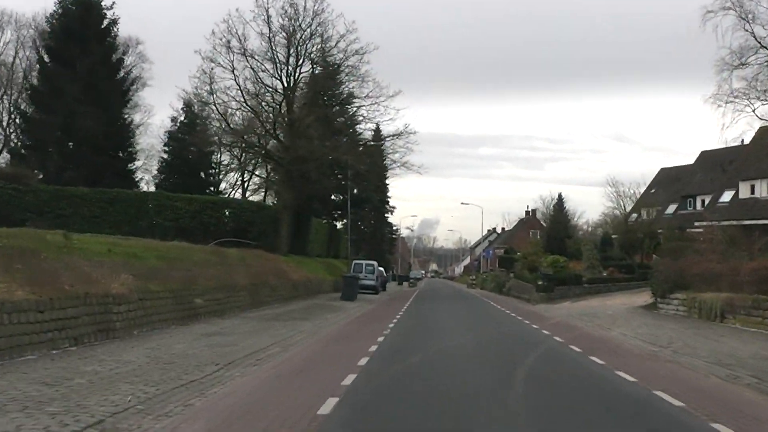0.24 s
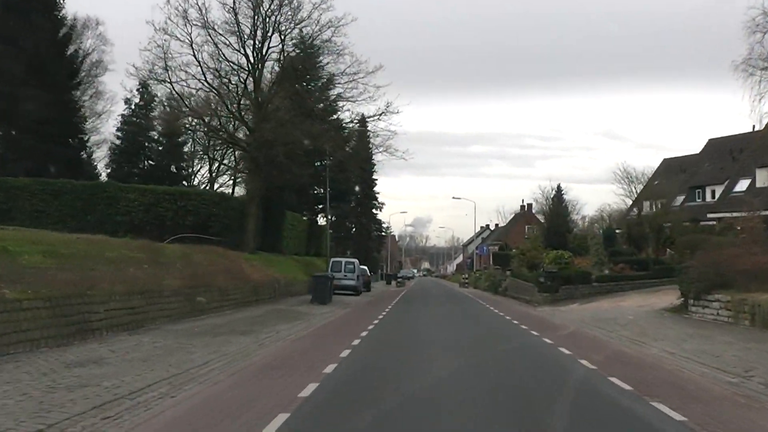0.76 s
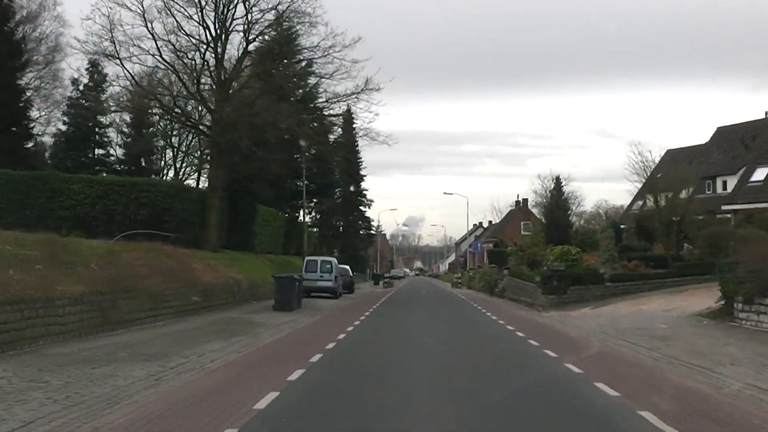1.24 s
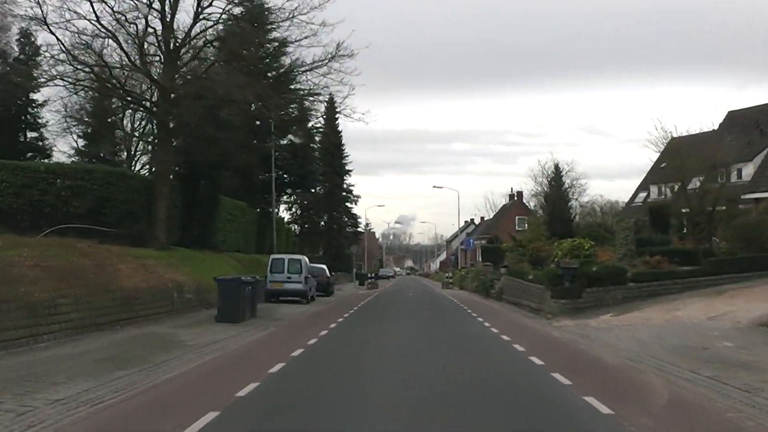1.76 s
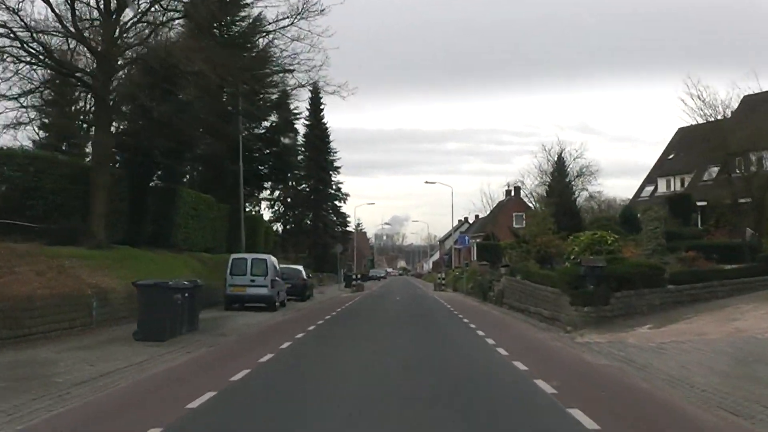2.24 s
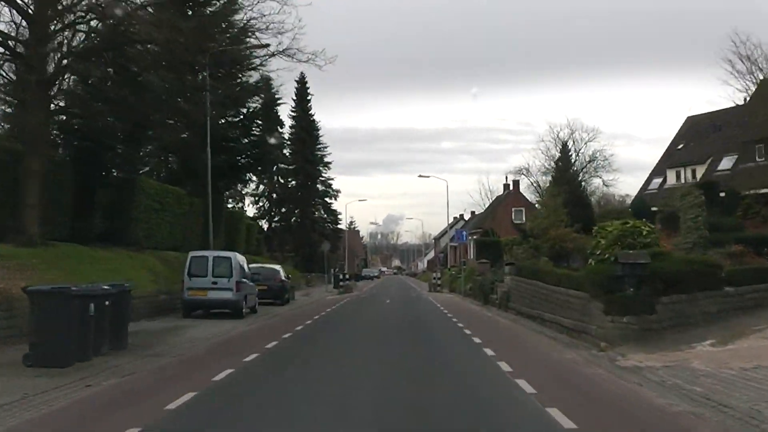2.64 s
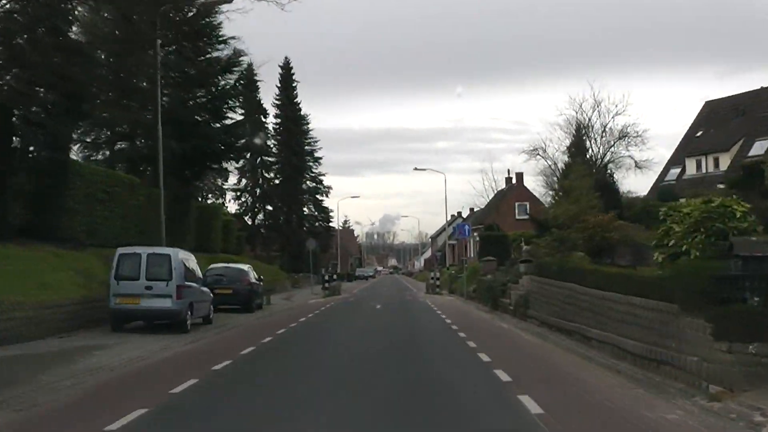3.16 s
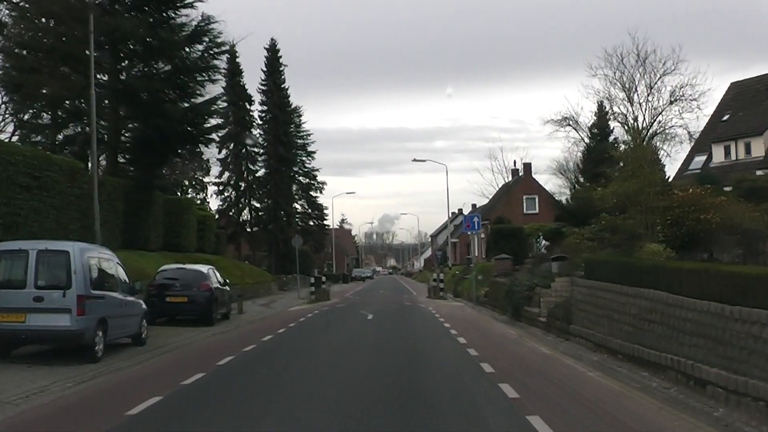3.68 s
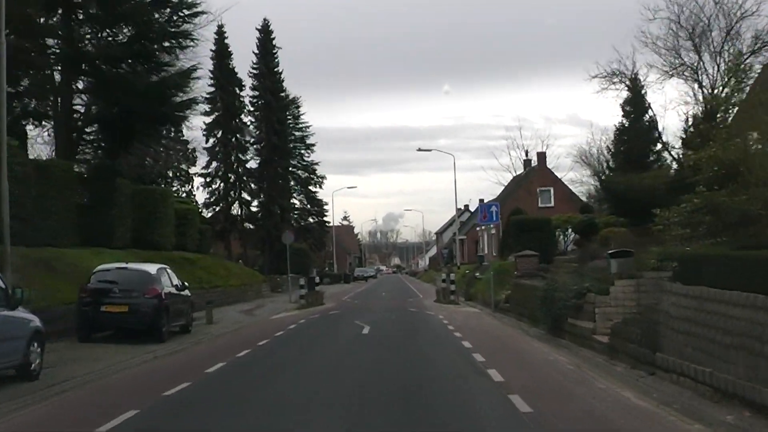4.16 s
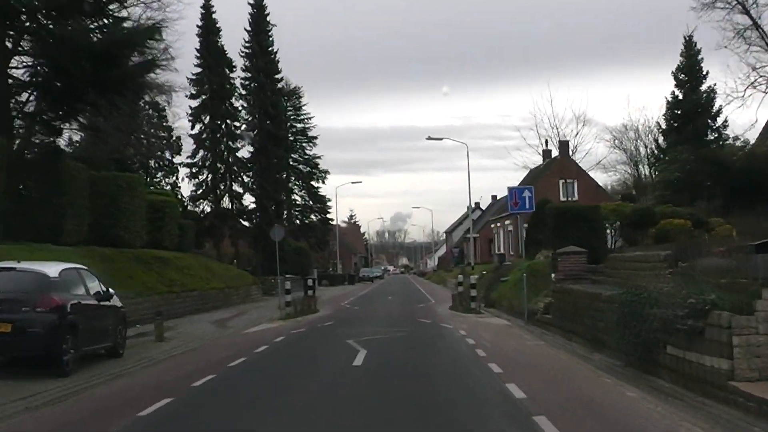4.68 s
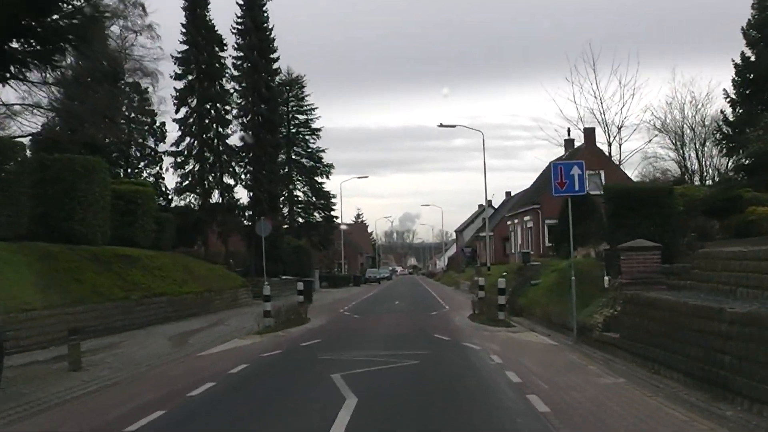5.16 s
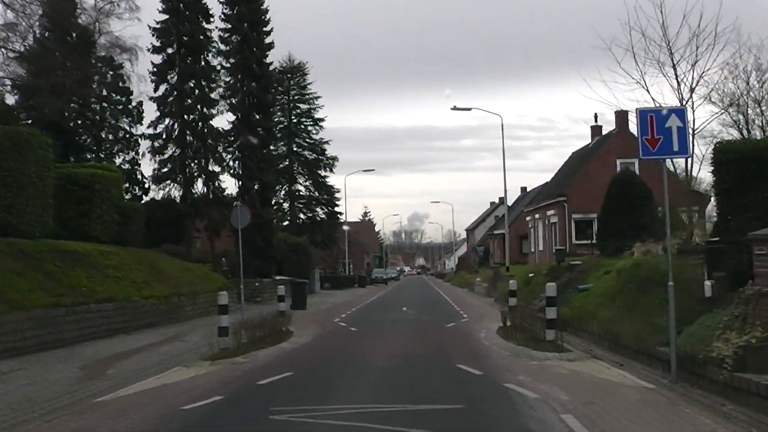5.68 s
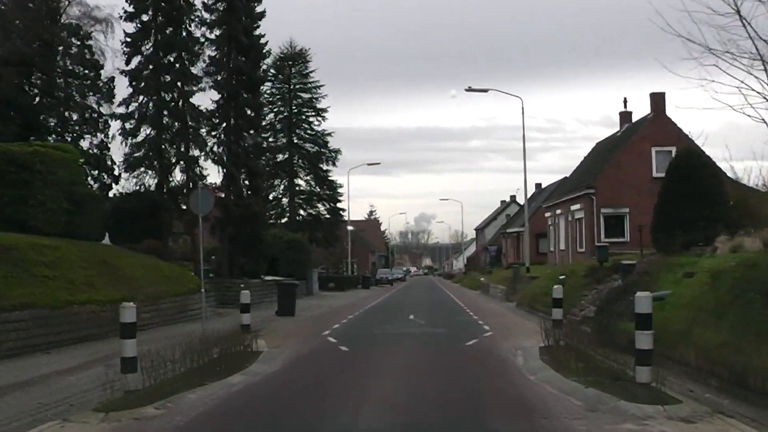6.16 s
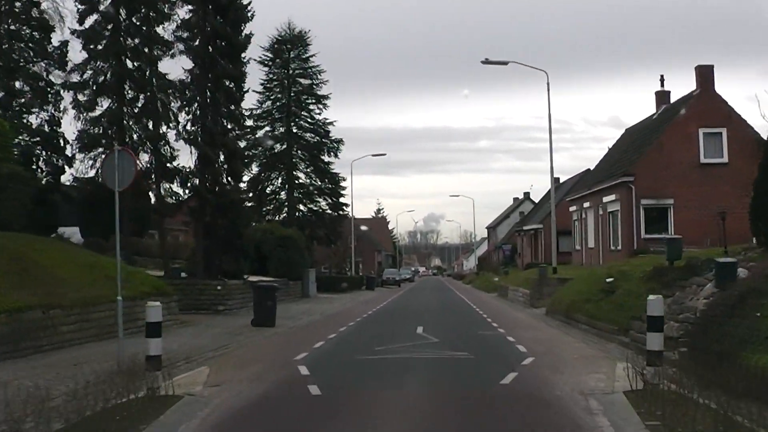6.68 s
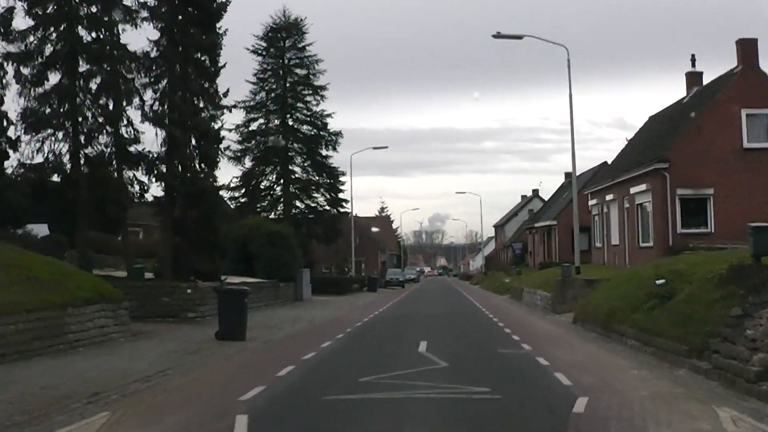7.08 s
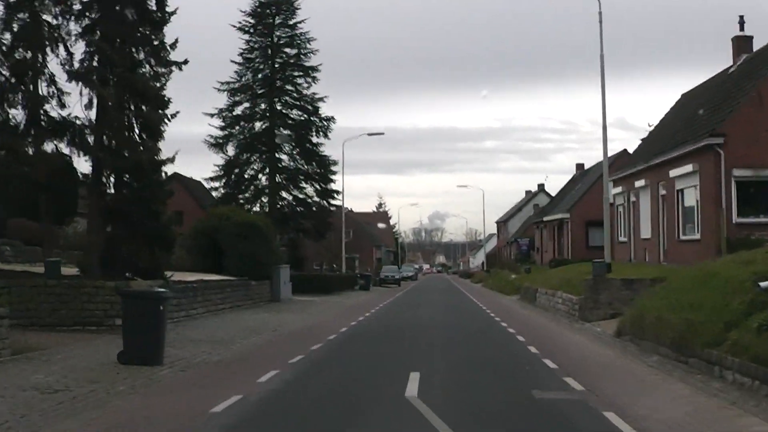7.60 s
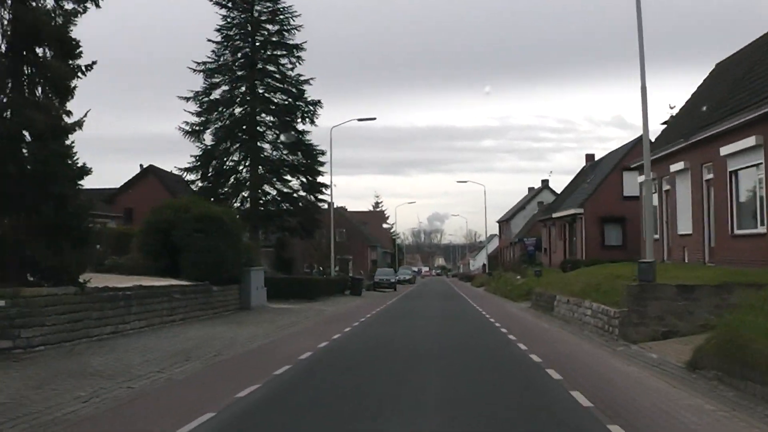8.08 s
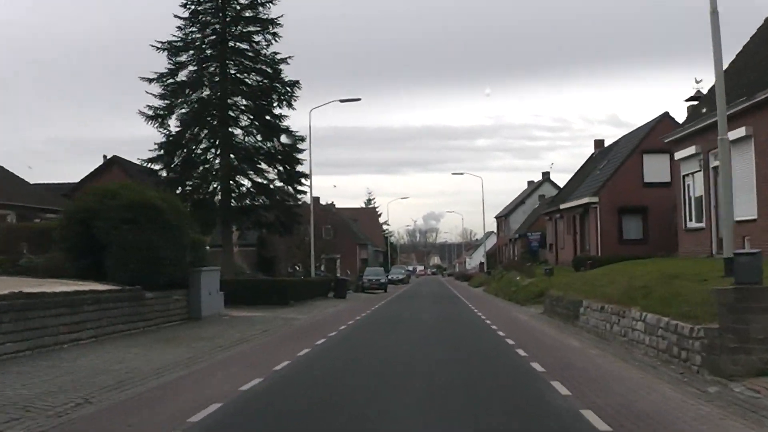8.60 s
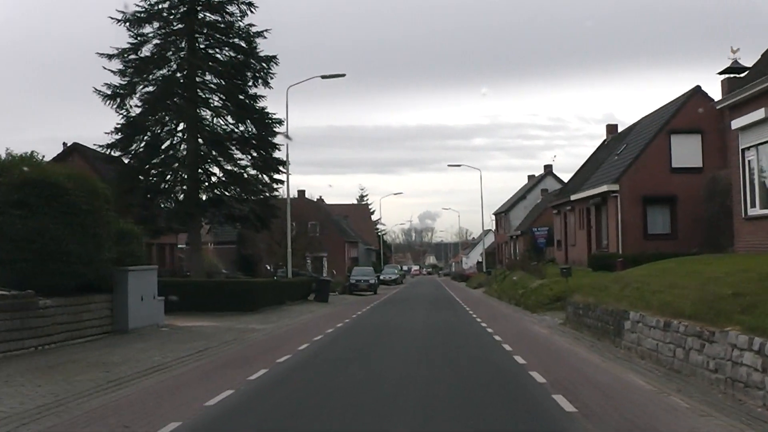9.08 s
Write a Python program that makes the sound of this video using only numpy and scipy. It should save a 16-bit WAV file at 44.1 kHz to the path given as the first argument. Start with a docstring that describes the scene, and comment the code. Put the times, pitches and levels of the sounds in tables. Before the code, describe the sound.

Inside a car driving steadily along a village street, a deep cabin drone and muffled tyre roar run throughout. Small soft bumps come early. Around seven seconds a rough patch makes the body boom heavily while loose trim ticks in quick bright snaps. A few hard knocks follow near eight and a half seconds, then the drone continues. Small stereo microphone on the dashboard, close, with automatic gain and faint noise.

```python
"""A low drone fills a car on an asphalt street: the road shakes springs, body, cabin air and tyre cavities,
each a bank of resonances fed with noise. Over it lies tread roar, noise coloured by the body panels.
A rougher stretch makes the body boom and loose trim tick; there are a few knocks and one click of a clipping
boom peak, all made of ringing noise bursts, and faint squeaks, made of wobbling sines. Faint treble hiss swells
at times. A small stereo microphone with gain control sits on the dashboard and adds its own floor and whine."""
import sys
import numpy as np
from scipy import signal
from scipy.fft import rfft, irfft, next_fast_len
from scipy.io import wavfile
from scipy.ndimage import uniform_filter1d

SR = 44100
rng = np.random.default_rng(int(sys.argv[2]) if len(sys.argv) > 2 else 0)


def nominal_scale(level):
    """Amplitude ratio for a level in decibels (scalar or array-like)."""
    x = np.asarray(level, float) / 20
    return 10 ** x


def wrap_up_sound(samples):
    """Save the sound to the file named by the first command line argument, as 16-bit audio."""
    columns = np.atleast_2d(samples).T
    # keep every value between -1 and 1, then stretch to whole-number steps
    tamed = np.clip(columns, -1, 1)
    steps = np.round(tamed * 32767).astype(np.int16)
    wavfile.write(sys.argv[1], SR, steps)


N = 411894
T = np.arange(N) / SR

# resonances driven by the road: (frequency [Hz], width [Hz], relative level [dB])
SPRING_RESONANCES = [(22.1, 4, -6), (34.5, 8, -2.5)]
SHELL_RESONANCES = [(46.7, 7.7, 0), (52, 4.2, -2.5), (100, 40, -16.5)]
CABIN_RESONANCES = [(65, 5, -11.5), (75.4, 7.9, -8.5), (89, 2.6, -8.5), (97.7, 5.3, 1.5), (117.1, 14, 0),
                    (141.2, 26, -8.5), (173.4, 16, -12)]
TYRE_RESONANCES = [(202.3, 14, -7), (212.3, 8, 0.5), (220.3, 19, -9)]
# bumps under the wheels: (start [s], length [s], strength [dB], share taken by the springs [0-1], rest by the shell)
WHEEL_BUMPS = [(.07, 0.077, -15, 0.42), (.55, 0.11, -21.5, .05), (2.28, 0.076, -21, .05),
               (2.72, .17, -18.5, .1), (3.3, 0.087, -23, 0.17), (3.63, 0.08, -17.5, 0.52),
               (3.88, .32, -19, 0.18), (5.26, 0.11, -23, .95), (5.66, .27, -23.5, 0.043),
               (5.959, 0.073, -26.5, .95), (6.92, 0.15, -10, .4), (7.15, .11, -6.5, .4),
               (7.39, .08, -6, 0.89), (7.52, 0.094, -4.5, .9), (7.67, 0.056, -8, 0.23),
               (7.86, 0.054, -10.5, .4), (8.16, .12, -15, 0.48), (8.46, 0.055, -9.5, .7),
               (8.72, 0.1, -13.5, 0.75), (8.96, 0.043, -19.5, .05), (9.12, 0.097, -31, 1)]
# the cabin drone wavers up now and then: (start [s], length [s], level [dB])
CABIN_SWELLS = [(0, 0.48, -22.5), (1.72, 0.44, -23), (3.25, 0.42, -24.5), (3.948, 0.23, -27),
                (5.1, .5, -27), (5.9, .4, -26), (7.2, 0.13, -21.5), (7.952, 0.69, -23), (9.1, .24, -24.5)]
# the tyre hum wavers up now and then: (start [s], length [s], level [dB])
TYRE_SWELLS = [(0, .4, -26.5), (0.655, 0.15, -23.5), (1.557, 0.25, -25.5), (2.636, 0.14, -23),
               (3.24, 0.07, -23.5), (3.846, 0.44, -24), (4.557, .15, -24.5), (5.15, 0.034, -29.5),
               (5.686, 0.32, -27), (6.806, 0.18, -24.5), (7.4, .25, -27), (7.745, .6, -29),
               (8.6, 0.31, -26), (9.144, 0.1, -26.5)]
# tread noise after muffling by the body: (frequency [Hz], relative density [dB per Hz])
ROAR_SPECTRUM = [(60, -25), (150, -7.5), (250, 0), (400, -5), (600, -14), (800, -18.5), (1100, -21),
                 (1350, -28.5), (1700, -33), (2000, -38.5), (2300, -46.5), (2450, -59), (3500, -68)]
# body panels that lift the roar or notch it: (frequency [Hz], width [Hz], lift [dB])
PANEL_RESONANCES = [(299.3, 13, 2), (349.7, 7.4, 3.5), (377, 15, 2), (465.4, 32, 2.5), (545, 18, 2.5),
                    (579, 30, -4), (681, 100, 6.5), (878, 17, 7), (959, 54, 7.5), (1096, 30, 4),
                    (1211, 33, 3), (1442, 57, 4), (1632, 70, 6), (1770, 37, 4), (2240, 60, 1.5)]
# trim ticks: (time [s], snap peak [dB], centre [Hz], scatter about a millisecond later [dB], left minus right [dB])
TRIM_TICKS = [(0.1438, -48, 7300, -58.5, -2), (0.2883, -45, 8800, -50, 1), (3.848, -47, 8500, -53, 0),
              (4.3414, -49, 7900, -62, 2), (4.6103, -47, 7200, -52, 2), (5.2434, -54, 6300, -62, 3),
              (6.9771, -48, 6100, -59, 3.5), (7.0541, -41, 5900, -49, -3), (7.07, -27, 6200, -46, -4),
              (7.088, -39, 6200, -44, -1), (7.12, -31, 7300, -47.5, -3), (7.1586, -30, 7100, -48, -4.5),
              (7.193, -29, 6500, -55, -2), (7.197, -22, 10500, -43, -2), (7.2105, -35, 6800, -41, -3),
              (7.2674, -41, 6500, -45, -1), (7.2916, -37, 6500, -47, -4), (7.3122, -18, 7300, -41, -2),
              (7.3273, -36, 8600, -56, -2.5), (7.3504, -39, 6400, -48, -5), (7.3559, -29, 9200, -48, 2),
              (7.373, -27, 6500, -50, -5), (7.4379, -42, 6500, -51, -3), (7.4556, -23, 7000, -43, -5),
              (7.4832, -38, 6000, -47, -4), (7.507, -24, 7200, -45, -5), (7.5472, -14.5, 13500, -48, 3),
              (7.5511, -30, 7000, -48, -1), (7.601, -46, 9000, -60, 1), (7.6103, -43, 7600, -52, -4),
              (7.6595, -21.5, 8200, -38, -2), (8.4663, -33, 8800, -48.5, -1), (9.2833, -46, 10000, -61, -1)]
# colour shared by the ticks: (frequency [Hz], relative density [dB per Hz])
TRIM_SPECTRUM = [(800, -23), (2000, -3), (3300, -10), (4300, -3), (7000, -6), (11000, -9), (16000, -16.5)]
# knocks of a hard object, except 7.225 s: that is a broadband click where a boom peak clips;
# (time [s], level before decay [dB], t60 [s], treble tilt [dB per octave], left minus right [dB])
KNOCKS_AND_CLICK = [(6.94, -39, 0.025, -4, 4), (7.225, -25, 0.012, -5, 3), (8.46, -38, 0.018, -8, 3),
                    (8.4658, -27.5, 0.035, -16, 1), (8.5642, -25.5, 0.058, -6, 3),
                    (8.576, -35, 0.035, -9, 0)]
# resonances that colour the knocks and the click: (frequency [Hz], width [Hz], relative level [dB])
BURST_RESONANCES = [(1100, 400, -12), (1550, 300, -10), (1870, 110, -3), (1970, 110, 0), (2350, 200, -10),
                    (3000, 250, -13), (4150, 450, -12), (4700, 300, -14), (5550, 350, -10),
                    (6200, 450, -12), (7900, 1500, -24)]
# faint squeaks of rubbing trim: (start [s], length [s], pitch [Hz], level [dB])
TRIM_SQUEAKS = [(1.62, .06, 5900, -77), (2.02, .05, 5600, -77), (8.745, .045, 8900, -75),
                (8.797, .05, 8950, -71), (8.83, .04, 10650, -71), (8.93, .03, 10600, -76)]
# swells of treble hiss, likely posts and walls sliding past:
# (time of the top [s], relative level [dB], rise [s], fall [s], centre [Hz])
HISS_SWELLS = [(.42, -58.5, 0.062, .12, 8800), (.78, -69.5, 0.059, 0.054, 9560), (1.2, -66, .05, .06, 7500),
               (2.7, -70, 0.05, .05, 8000), (5.43, -63, 0.14, 0.063, 9100), (5.8, -65.5, 0.027, 0.1, 9500),
               (7.0, -65, .08, .1, 7950), (7.4, -68, 0.16, 0.24, 6000), (8.001, -65.5, 0.16, 0.081, 8500),
               (8.52, -65.5, .05, 0.17, 9400), (8.9, -68.5, 0.16, .15, 9500)]
# microphone noise floor: (frequency [Hz], relative density [dB per Hz])
FLOOR_SPECTRUM = [(1470, -31), (2500, -6), (2790, -4), (3220, -10), (3970, -4), (4260, -1.5), (4820, -2.5),
                  (5280, -2), (6610, -3.5), (7530, -4.5), (8390, -5.5), (9720, -4), (12600, -8),
                  (15800, -9)]
# thin electrical tones: (frequency [Hz], level before gain control [dB rms])
WHINE_TONES = [(10051, -84), (12059, -93.5), (14067, -94.5), (15617, -89)]
# stereo image of the noises: (frequency [Hz], left-right likeness [0-1])
STEREO_LIKENESS = [(60, 1), (300, 1), (640, 0.99), (1400, 0.76), (2200, 0.76), (3100, 0.35), (6800, 0.3),
                   (15000, .05)]
# stereo balance of the noises: (frequency [Hz], left minus right [dB])
STEREO_LEAN = [(60, 3), (110, 3.0), (200, 3), (380, 2.5), (700, 2.5), (1290, 2.0), (2380, 1), (4400, 0.5),
               (8120, -1), (15000, 0)]

# steady levels on smooth asphalt [dB]
SPRING_DB, SHELL_DB, CABIN_DB, TYRE_DB, ROAR_DB = -25.5, -25, -23, -28.5, -27
BUMP_RISE_S, BUMP_FALL_S, BUMP_IN_CABIN_DB = 0.018, 0.03, -9.5
WAVER_RISE_S, WAVER_FALL_S = 0.04, 0.036


def evened(x):
    """Scales to rms 1."""
    return x / np.sqrt(np.mean(x ** 2) + 1e-20)


def read(points, hz):
    """Reads a spectrum table on a log-frequency axis."""
    f, value = np.transpose(points)
    return np.interp(np.log(hz + 1), np.log(f + 1), value)


def add(mix, s, sound):
    """Mixes a one- or two-channel sound in at s seconds."""
    part = mix[:, round(s * SR):][:, :sound.shape[1]]
    part += sound[:, :part.shape[1]]


def panned(db, pan_db):
    """Gains of the left and right channel, pan_db apart around db."""
    return nominal_scale(db + np.array([[pan_db], [-pan_db]]) / 2)


def resonance(modes, hz, steepness):
    """Gain of a bank of resonances whose powers add; steepness sets how fast their skirts fall."""
    return np.sqrt(sum(nominal_scale(db) ** 2 / (1 + (2 * (hz - f) / w) ** 2) ** steepness for f, w, db in modes))


def pair(gain):
    """Two partly alike channels of noise with the spectrum gain(hz), at rms 1."""
    size = next_fast_len(N)
    hz = np.fft.rfftfreq(size, 1 / SR)
    left, other = rfft(rng.standard_normal((2, size)), axis=1)
    same = np.clip(read(STEREO_LIKENESS, hz), -1, 1)
    right = same * left + np.sqrt(1 - same ** 2) * other
    lean = nominal_scale(read(STEREO_LEAN, hz) / 2)
    lag = np.exp(-2j * np.pi * hz / SR)  # the left port hears one sample later
    spectra = np.array([left * lean * lag, right / lean])
    return evened(irfft(spectra * gain(hz), size, axis=1)[:, :N])


def rung(modes, steady, smooth_s):
    """Road noise through steep resonances; steady 0-1 takes out the chance swells of narrow noise."""
    x = pair(lambda hz: resonance(modes, hz, 1.57))
    power = uniform_filter1d((x ** 2).mean(0), round(smooth_s * SR))
    return evened(x / (power + 0.027) ** (steady / 2))


def swells(rows, rise_s, fall_s):
    """Summed power of events (start [s], length [s], power) that rise, hold and die away."""
    total = 0
    for s, length, power in rows:
        before, after = np.minimum(T - s, 0), np.maximum(T - s - length, 0)
        total = total + power * np.exp(-(before / rise_s) ** 2 - (after / fall_s) ** 2)
    return total


def wavers(rows):
    """Power of the level swells (start [s], length [s], level [dB])."""
    return swells([(s, length, nominal_scale(db) ** 2) for s, length, db in rows], WAVER_RISE_S, WAVER_FALL_S)


def bumps():
    """Splits the power of each bump between springs (soft) and body shell (hard)."""
    soft_rows = [(s, length, nominal_scale(db) ** 2 * share) for s, length, db, share in WHEEL_BUMPS]
    hard_rows = [(s, length, nominal_scale(db) ** 2 * (1 - share)) for s, length, db, share in WHEEL_BUMPS]
    return swells(soft_rows, BUMP_RISE_S, BUMP_FALL_S), swells(hard_rows, BUMP_RISE_S, BUMP_FALL_S)


def springs(soft):
    """The car heaves on its springs, deepest of all; soft bumps add to it."""
    return np.sqrt(nominal_scale(SPRING_DB) ** 2 + soft) * rung(SPRING_RESONANCES, steady=0.8, smooth_s=0.045)


def shell(hard):
    """The body shell booms; hard bumps add to it."""
    return np.sqrt(nominal_scale(SHELL_DB) ** 2 + hard) * rung(SHELL_RESONANCES, steady=0.65, smooth_s=0.067)


def cabin(soft, hard):
    """The cabin air resonates, wavers, and takes up part of each bump."""
    bump_power = nominal_scale(BUMP_IN_CABIN_DB) ** 2 * (hard + 0.33 * soft)
    level = np.sqrt(nominal_scale(CABIN_DB) ** 2 + bump_power + wavers(CABIN_SWELLS))
    return level * rung(CABIN_RESONANCES, steady=0.41, smooth_s=0.14)


def tyre():
    """The air in the tyre cavities hums and wavers, untouched by the bumps."""
    level = np.sqrt(nominal_scale(TYRE_DB) ** 2 + wavers(TYRE_SWELLS))
    return level * rung(TYRE_RESONANCES, steady=0.17, smooth_s=0.048)


def drone():
    """Springs, body shell, cabin air and tyre cavities ring together under the road's shaking."""
    soft, hard = bumps()
    return springs(soft) + shell(hard) + cabin(soft, hard) + tyre()


def roar():
    """Tread noise, muffled by the body and coloured by its panels; it grows louder late on."""
    def gain(hz):
        panels_db = sum(db / (1 + (2 * (hz - f) / w) ** 2) for f, w, db in PANEL_RESONANCES)
        return nominal_scale(read(ROAR_SPECTRUM, hz) + panels_db)
    coarse = np.clip((T - 6.7) / 0.24, 0, 1)
    trailing = np.clip((T - 6.75) / 0.24, 0, 1)
    # 1.6 dB louder in the end, with up to half a dB extra on the way up
    rise_db = 1.6 * coarse + 2.3 * (coarse - trailing)
    return nominal_scale(ROAR_DB + rise_db) * pair(gain)


def rattle(count):
    """Fainter ticks in rows like the trim ticks, scattered by chance over a short span."""
    from_s, to_s, snap_db, centre_hz, scatter_db = 7.68, 8.2, -48, 7000, -61
    rows = []
    for when, size, side in rng.random((count, 3)):
        louder_db = 8 * (size - 0.5)
        time_s = from_s + (to_s - from_s) * when
        rows.append((time_s, snap_db + louder_db, centre_hz, scatter_db + louder_db, -6 * side))
    return rows


def ticks():
    """Each trim tick: a sharp snap, an uneven scatter of reflections per side, a faint cabin tail, one bounce."""
    t60_s, tail_t60_s, bounce_s, bounce_db = 0.032, 0.07, 0.005, -11
    lead = 0.0005  # room before the snap [s]
    out, t = np.zeros((2, N)), np.arange(2048) / SR
    hz = np.fft.rfftfreq(len(t), 1 / SR)
    rows = TRIM_TICKS + rattle(count=10)
    draws = rng.standard_normal((len(rows), 4, len(t)))
    for (s, snap_db, centre_hz, scatter_db, pan_db), (shared, left, right, lumps) in zip(rows, draws):
        octaves = np.log2(hz / centre_hz + 1e-3).clip(-1.1, 1.3)
        colour = nominal_scale(read(TRIM_SPECTRUM, hz) - 8.3 * octaves ** 2)
        # the two ports hear the snap a little apart
        arrival = lead + np.array([[0], [0.00005 * lumps[0]]])
        phase = np.exp(-2j * np.pi * hz * arrival + 1j * shared[0])
        snap = irfft(colour ** 0.5 * phase, axis=1)
        noise = [left, right] + 0.34 * shared
        scatter = evened(irfft(rfft(noise, axis=1) * colour, axis=1))
        lumpy_db = 3 * evened(uniform_filter1d(lumps, size=30))
        tail = nominal_scale(-12.5 - 60 * t / tail_t60_s)
        decay = nominal_scale(lumpy_db - 60 * (t - 3 * lead) / t60_s) + tail
        scatter *= nominal_scale(scatter_db) * decay * np.minimum(t / lead, 1)
        sound = nominal_scale(snap_db) * snap / abs(snap).max() + scatter
        sound = sound + nominal_scale(bounce_db) * np.roll(sound, round(bounce_s * SR), axis=1)
        add(out, s - lead, panned(0, pan_db) * sound)
    return out


def knocks_and_click():
    """Hard taps, and the click of one clipping boom peak: each a noise burst through damped resonances."""
    out, t = np.zeros((2, N)), np.arange(4096) / SR
    hz = np.fft.rfftfreq(len(t), 1 / SR)
    body = resonance(BURST_RESONANCES, hz, 1.6)
    draws = rng.standard_normal((len(KNOCKS_AND_CLICK), 3, len(t)))
    for (s, db, t60_s, tilt_db, pan_db), draw in zip(KNOCKS_AND_CLICK, draws):
        octaves = np.log2(hz / 2000 + 1e-3).clip(-1, 3)
        colour = body * nominal_scale(tilt_db * octaves)
        burst = draw[0] + 0.74 * draw[1:]  # partly alike in both channels
        ring = evened(irfft(rfft(burst, axis=1) * colour, axis=1))
        ring *= nominal_scale(-60 * t / t60_s) * np.minimum(t / 0.002, 1)
        add(out, s, panned(db, pan_db) * ring)
    return out


def squeaks():
    """Rubbing trim whistles briefly: sines that wobble and sag a little in pitch."""
    sag, wobble_depth = 0.02, 0.004  # shares of the pitch
    out = np.zeros((2, N))
    draws = rng.standard_normal((len(TRIM_SQUEAKS), 1, 4096))
    for (s, length, hz, db), draw in zip(TRIM_SQUEAKS, draws):
        u = np.arange(0, 1, 1 / (length * SR))[:draw.shape[1]]  # progress 0-1
        wobble = evened(uniform_filter1d(draw, size=300, axis=1))[:, :len(u)]
        pitch = hz * (1 - sag * (u - 0.5) + wobble_depth * wobble)
        tone = np.sin(2 * np.pi * np.cumsum(pitch, axis=1) / SR)
        add(out, s, np.sqrt(2) * nominal_scale(db) * np.sin(np.pi * u) ** 0.5 * tone)
    return out


def hiss():
    """Each swell is a wide band of slightly grainy noise that rises and falls smoothly."""
    size, width_hz = 512, 3400
    hz, t, z = signal.stft(pair(lambda hz: hz > 2000), SR, nperseg=size)
    power = 0
    for s, db, rise, fall, centre_hz in HISS_SWELLS:
        band = ((hz[:, None] - centre_hz) / width_hz) ** 2
        course = ((t - s) / np.where(t < s, rise, fall)) ** 2
        power = power + nominal_scale(db) ** 2 * np.exp(-band - course)
    flicker = nominal_scale(1.5 * rng.standard_normal(len(t)))
    return 2 * signal.istft(z * np.sqrt(power) * flicker, SR, nperseg=size)[1][:, :N]


def scene():
    """Sums all layers but the microphone's own noise."""
    return drone() + roar() + ticks() + knocks_and_click() + squeaks() + hiss()


def microphone_floor():
    """The microphone's own noise, kept above 1500 Hz."""
    return nominal_scale(-64) * pair(lambda hz: nominal_scale(read(FLOOR_SPECTRUM, hz)) * (hz > 1500))


def whine():
    """Thin electrical tones: steady sines."""
    return sum(np.sqrt(2) * nominal_scale(db) * np.sin(2 * np.pi * hz * T) for hz, db in WHINE_TONES)


def gain_control_db(dry):
    """Reduction [dB] that follows the peaks of the scene and recovers slowly."""
    threshold_db, recovery_db_per_s, strength = -10, 10, 0.31
    power_db = 10 * np.log10(abs(uniform_filter1d((dry ** 2).mean(0), size=600)) + 1e-12)
    fall = T * recovery_db_per_s
    held_db = np.maximum.accumulate(power_db + fall) - fall
    over_db = np.maximum(held_db - threshold_db, 0)
    return strength * uniform_filter1d(over_db, size=300)


def roll_off(x):
    """The treble ends steeply here."""
    return signal.sosfilt(signal.butter(12, 16790, fs=SR, output="sos"), x)


def record(dry):
    """The microphone adds floor and whine; gain control ducks the booms; peaks round off; the top is cut."""
    ducked = (dry + microphone_floor() + whine()) / nominal_scale(gain_control_db(dry))
    rounded = ducked / (1 + (ducked / 0.97) ** 6) ** (1 / 6)
    ends = np.minimum(np.minimum(T, T[::-1]) / 0.004, 1)  # soft start and stop
    lowpass = signal.firwin(1023, 15830, window=("kaiser", 9), fs=SR)
    finished = signal.oaconvolve(rounded * ends, lowpass[None], "same")
    return roll_off(finished)


dry = scene()
out = record(dry)
wrap_up_sound(out)
```